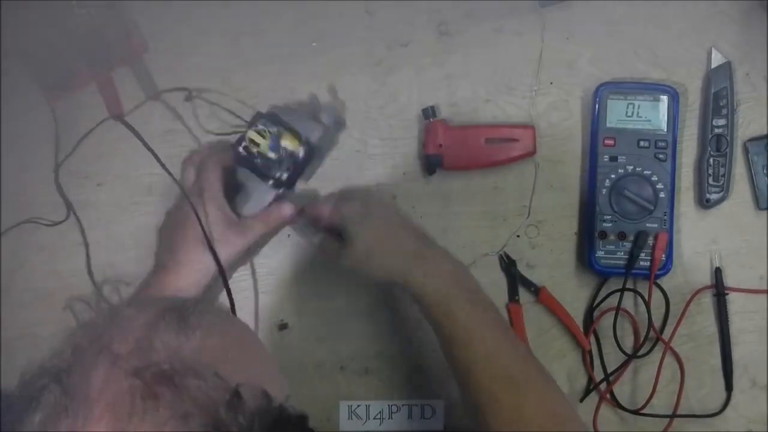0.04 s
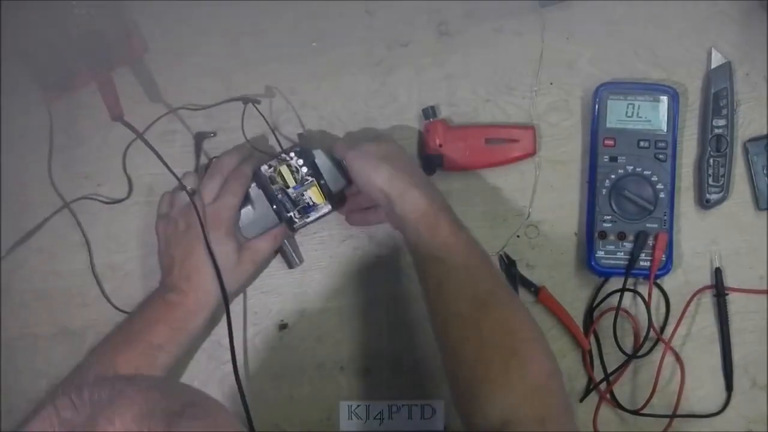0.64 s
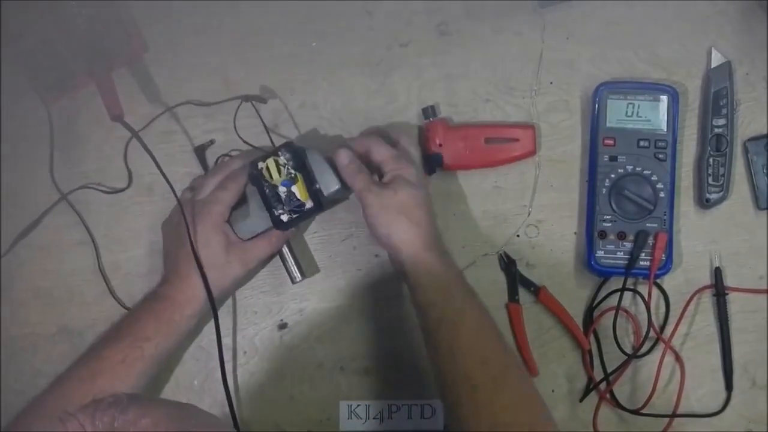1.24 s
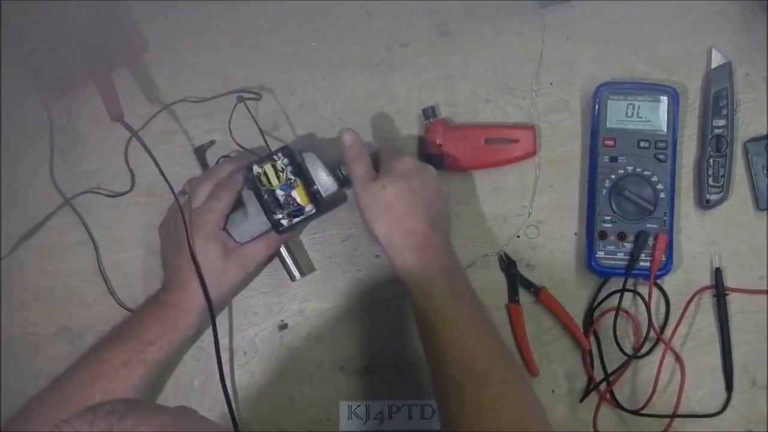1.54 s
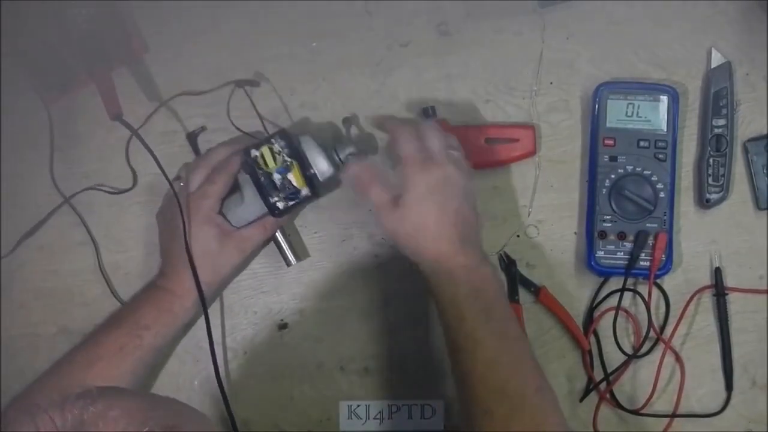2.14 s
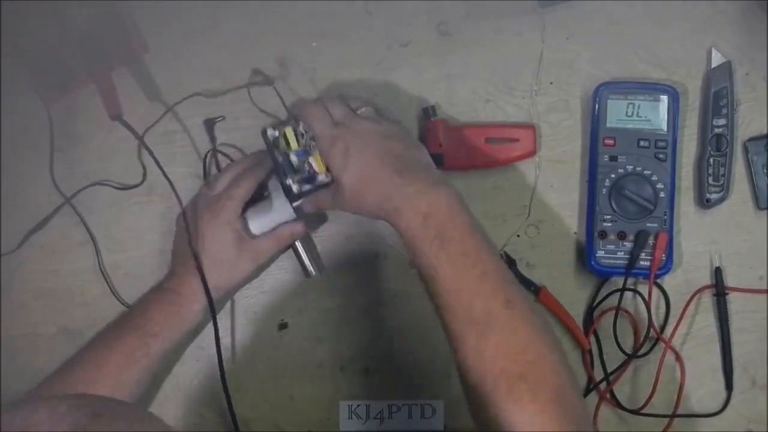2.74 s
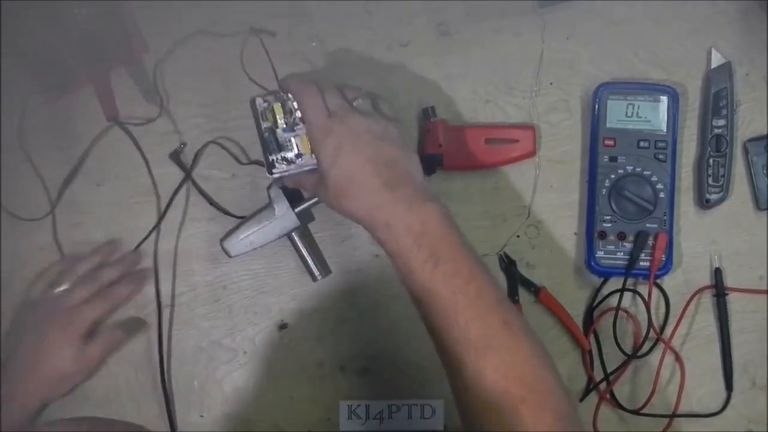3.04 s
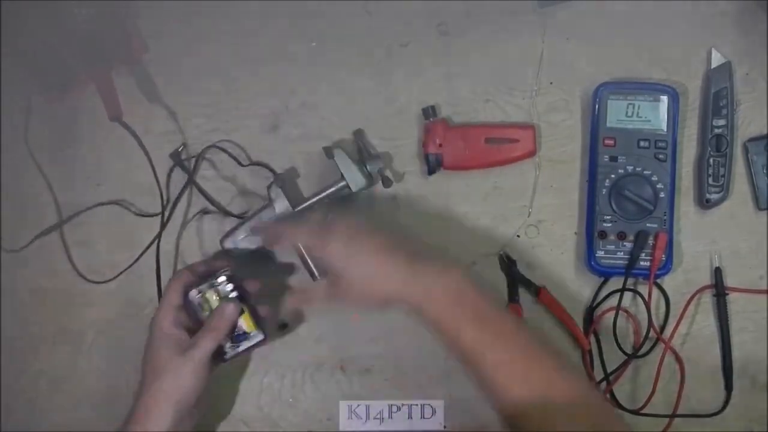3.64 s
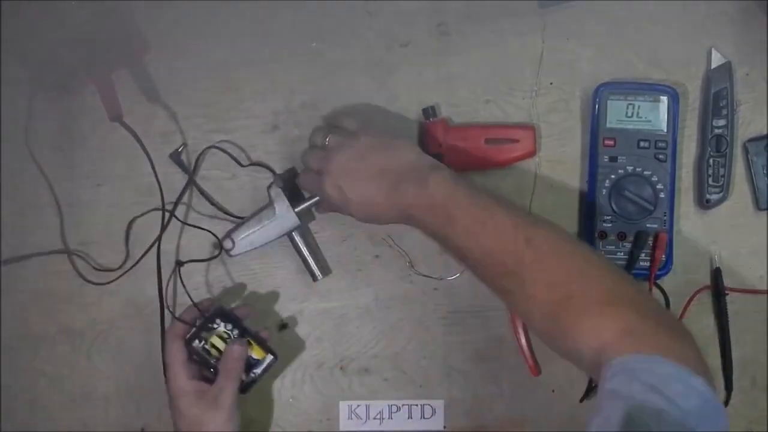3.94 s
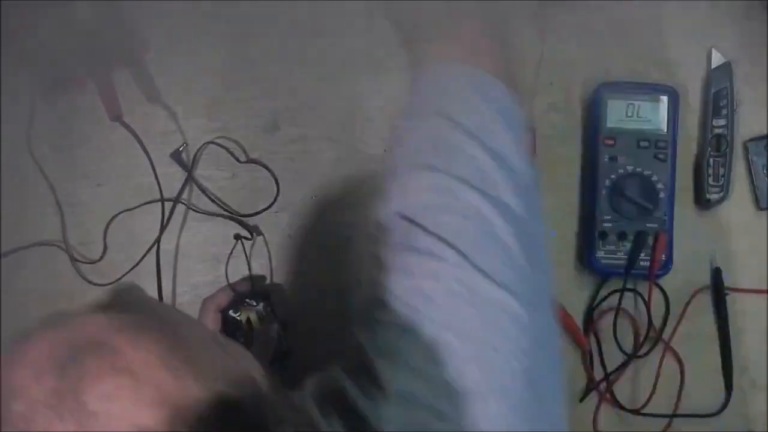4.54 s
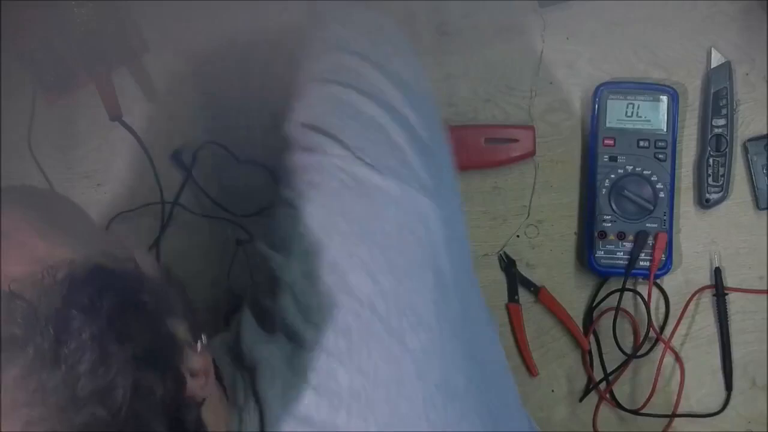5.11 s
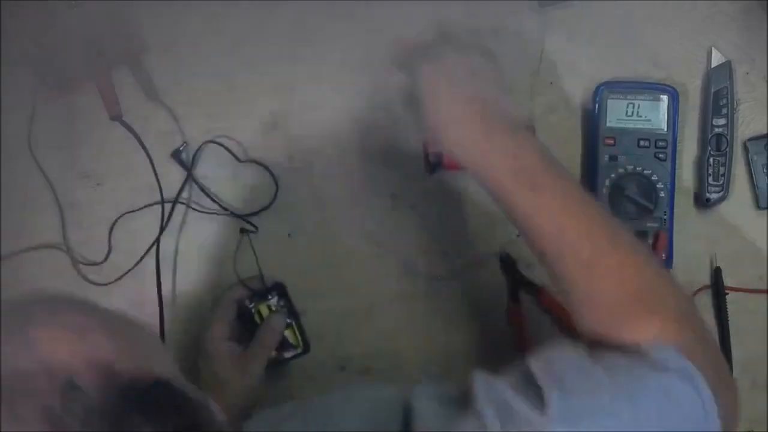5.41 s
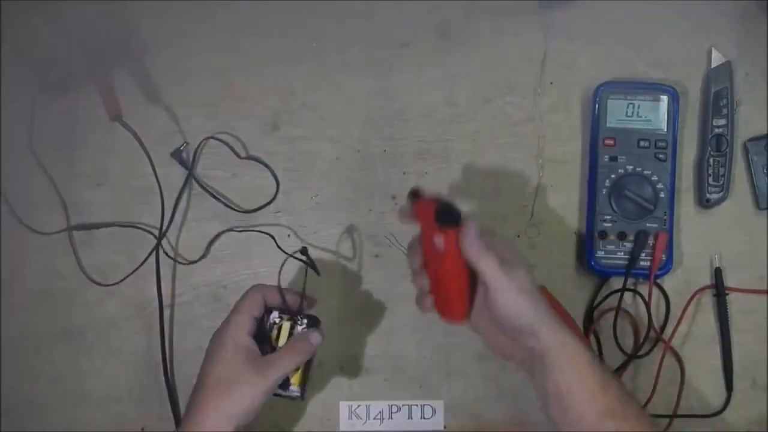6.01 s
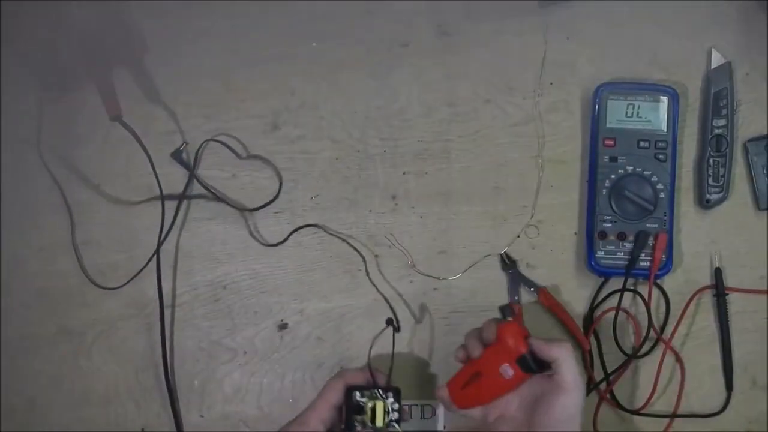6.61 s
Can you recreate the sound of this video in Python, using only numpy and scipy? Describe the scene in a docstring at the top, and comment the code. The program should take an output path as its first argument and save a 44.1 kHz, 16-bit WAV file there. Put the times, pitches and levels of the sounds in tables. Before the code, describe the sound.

A small vise and a plastic case scrape and thump on a wooden workbench, each blow making the top ring. The steel handle clinks, plastic clicks and briefly squeaks, and a sleeve swishes. A cluster of loud knocks and rattles follows as the vise is put away. Finally a small gas torch clicks several times and hisses faintly. It all sounds close, in a small workshop with a low throbbing hum.

```python
"""Scrapes and thumps on a wooden workbench, as a small vise is loosened, shifted and put away.
Each blow sets the bench top ringing. Steel parts clink, a plastic power-supply case clicks, scrapes
and squeaks, and a sleeve swishes. Then a small gas torch is picked up, clicks and hisses faintly.
Behind it all are the small workshop's air, a throbbing motor hum and a thin electronic whine.
A limiter turns everything down for a moment after the hardest blows."""
import sys
import numpy as np
from scipy import signal
from scipy.fft import rfft, irfft, next_fast_len
from scipy.io import wavfile
from scipy.ndimage import uniform_filter1d, minimum_filter1d

SR = 44100
rng = np.random.default_rng(int(sys.argv[2]) if len(sys.argv) > 2 else 0)


def int16_out(signal):
    """Quantize to a 16-bit WAV file."""
    q = np.round(np.clip(np.atleast_2d(signal).T, -1, 1) * 32767)
    wavfile.write(sys.argv[1], SR, q.astype(np.int16))


N = 298557
TIME = np.arange(N) / SR
RING_TIME = TIME[:SR // 2]  # half a second for one sound to die away


def bench(gain_db=36, ring_db=-17, clack_hz=1900, tick_hz=7000, spot_spread=1.37):
    """Each blow pushes the board once; its low tones and a blur of higher ones ring on."""
    # blows: start_s, body_db, thud_db, clack_db, tick_db, spot_hz, lift_db, chatter_db
    # thud, clack and tick are relative to the body; little chatter gives a clean, dry crack
    knocks = [ (.162, -20, 7, -17, -23, 256, 16, 16), (.168, -16, 6, -28, -14.5, 280, 6, 7),
              (0.188, -0.5, -3, -11, -21.5, 389, 10, 8), (0.227, -22.5, -3, -1, -28, 229, 20, 14),
              (.515, -17.5, -1.5, -26.5, -37, 340, 8, 17), (.545, -24, 0, -31, -37, 540, 3, 16),
              (0.759, -36.5, 14.5, -22, -24, 270, 4, 22), (0.802, -35.5, 9, -11, -32, 257, 16.5, 3.6),
              (0.983, -35, 12.5, -23, -19, 232, 6, 13), (1.892, -13, -6, -16.5, -38, 504, 3.5, 11),
              (2.389, -15, -7, -2, -30, 406, 1.5, 7.4), (2.3912, -17, -5, -9, -46, 1240, 5, 16),
              (2.402, -23.5, -14, -8, -24, 2100, 5, 0.67), (2.4179, -17, -2.5, -32, -32, 890, 5, 6),
              (2.792, -12, 1, -10.5, -26, 415, 0.5, 11), (2.795, -13.5, -4, -7.5, -23.5, 410, 7.5, 7.4),
              (2.828, -17.5, -5.5, -16, -40, 395, 2.5, 11), (4.0485, -8, -1, -16.5, -30, 246, -2.5, 16.5),
              (4.844, -5, -6, -16.5, -24, 248, 7.5, 19), (4.848, -13, -7.5, -4.5, -17, 280, -27, 4.4),
              (4.965, -25, 9, -10, -19, 380, -1, 14), (5.001, -23.5, -2, -14, -15, 940, 9, 12),
              (5.0343, -9.5, -9, -16, -48, 269, 4, 22), (5.038, -17.5, -8, -5.5, -25, 2320, -2, 1),
              (5.069, -25, -1, -15.5, -11, 2240, 11.5, 3), (5.654, -46.5, 6, -2, 4, 334, 23, 11),
              (5.724, -39, 1, -6, -23, 346, 17.5, 9)]
    # the bench top's natural tones (its "modes"): pitch_hz, level_db
    bench_modes = [(86, -26), (112, -18), (130, -9.5), (198, -17), (224, -7.5), (250, -9.5), (289, -4.5),
                   (322, -9.5), (370, -11.5), (395, -7), (432, -16), (505, -16.5), (575, -9.5), (645, -9.5),
                   (692, -6.5), (796, -39), (1036, -24), (1300, -14.5), (2080, -17)]
    # wood damps higher tones sooner: pitch_hz, fade_s
    bench_fades = [(90, .26), (250, .2), (400, .14), (800, .1)]
    # how strongly wood gives off each pitch: pitch_hz, level_db
    wood = [(30, -51), (60, -10), (90, 6.5), (250, 0.5), (400, 1.5), (700, 0), (1000, 5), (1500, 3.5),
            (2200, 7), (3000, 0), (4000, -6), (6000, -8), (10000, -13), (15000, -15)]
    board = [(hz, db, on_log_axis(hz, bench_fades)) for hz, db in bench_modes]
    out = np.zeros((2, N))
    for start_s, body_db, thud_db, clack_db, tick_db, spot_hz, lift_db, chatter_db in knocks:
        hardness = [(130, thud_db), (220, 0), (600, 0), (clack_hz, clack_db), (tick_hz, tick_db)]
        # the place that is struck favours some tones
        spot = [(spot_hz / spot_spread, 0), (spot_hz, lift_db), (spot_hz * spot_spread, 0)]
        tones = struck(board, detune=0.008)
        impact = contact(chatter_db, fade_s=0.22).mean(axis=0)
        blow = colour(impact + undb(ring_db) * tones, wood, hardness, spot)
        add(out, start_s, undb(body_db + gain_db) * room(blow, wet_db=-5, width_db=4.5))
    return out


def clicks(gain_db=33, shell_db=-14):
    """Small parts snap against each other and ring briefly on two tones."""
    # light clicks of the case and vise screw: start_s, snap_db, treble_db, pitch_hz, ring_db
    # treble and ring are relative to the snap
    snaps = [ (0.616, -40.5, -22, 2580, -31), (0.76, -37.5, -14, 1860, -2),
             (0.7967, -31.5, -13.5, 2980, 3.5), (0.815, -35.5, -17, 2120, 5), (.832, -36.5, -24, 2660, 4),
             (.904, -31.5, -29, 2070, -15), (1.241, -35.5, -21, 2600, -3), (1.383, -50.5, -22, 2330, 17),
             (2.1689, -38, -7, 2330, 0), (2.3164, -35, -31, 1060, 2.5), (2.3891, -38.5, -22, 3170, 16),
             (2.481, -35.5, -15, 1650, -18), (2.645, -47, -44, 1920, 3.5), (3.106, -32, -14.5, 1500, -2),
             (3.595, -55, -8, 1960, 11), (3.633, -38.5, -16, 2070, -1), (4.509, -49.5, -1.5, 2350, -1),
             (4.921, -35.5, -10, 1710, 8.5), (4.967, -36, -12, 2040, -8)]
    # how strongly plastic gives off each pitch: pitch_hz, level_db
    plastic = [(100, -41), (500, -2.5), (1000, -3.5), (1900, 4), (3000, 0.5), (4000, 2.5), (6000, 4),
               (9000, -0.5), (12000, -3.5), (15000, -6)]
    out = np.zeros((2, N))
    for start_s, snap_db, treble_db, pitch_hz, ring_db in snaps:
        tones = ring([(pitch_hz, 0, 0.014), (pitch_hz * 1.3, -6, 0.008)])
        snap = contact(chatter_db=45, fade_s=0.048) + undb(ring_db + shell_db) * tones
        click = colour(snap, plastic, [(2800, 0.0046), (6000, treble_db)])
        add(out, start_s, undb(snap_db + gain_db) * click)
    return room(out, wet_db=-1.5)


def handle(slide_s=0.0018, build_s=0.00088):
    """The vise handle grates through its hole, hits its stop and gives a short, tight clink."""
    # the sliding handle drops: hit_s, ring_db, grit_db (relative to the ring)
    drops = [(.426, 14, -13), (1.4395, -3, -10)]
    # the handle's tones: pitch_hz, level_db, fade_s
    handle_modes = [(1815, 0, .032), (1930, -7, .02), (2430, -9, .02), (3005, -14, .025)]
    clink = ring(handle_modes) * (1 - np.exp(-RING_TIME / build_s))
    out = np.zeros((2, N))
    for hit_s, ring_db, grit_db in drops:
        grit = contact(chatter_db=30, fade_s=0.016, build_s=0.004)
        grit = colour(grit, [(1000, -14), (3000, 0.0072)])
        add(out, hit_s - slide_s, undb(ring_db + grit_db) * grit)
        add(out, hit_s, undb(ring_db) * clink)
    return room(out, wet_db=-6.5)


def clinks(bright_gain_db=9, low_gain_db=1, low_fade_s=0.062, rattle_db=-8):
    """The loose steel screw and handle rattle and ring high and thin."""
    # steel meets steel: start_s, low_hz, low_db, bright_db
    hits = [ (0.425, 8050, -21, -42), (0.983, 6090, -27, -38), (2.168, 7180, -19.5, -21),
            (2.394, 7100, -28, -24), (2.796, 7090, -17, -31), (4.508, 6500, -22, -38),
            (4.846, 6330, -21, -22), (4.92, 6370, -19, -34), (4.966, 6360, -15, -39),
            (5.005, 7060, -19, -25)]
    # the steel's bright upper tones: pitch_hz, level_db, fade_s
    steel_modes = [(12250, -8, .02), (13990, 0, .045), (14300, -4, .02), (14700, -7, .015),
                   (15450, -10, .012)]
    out = np.zeros((2, N))
    for start_s, low_hz, low_db, bright_db in hits:
        touch = contact(chatter_db=13, fade_s=0.039)
        rattle = colour(touch, [(3000, -37), (8000, -52), (12000, 12), (14500, 9)])
        bright = struck(steel_modes, detune=0.005) + undb(rattle_db) * rattle
        low = ring([(low_hz, low_db + low_gain_db, low_fade_s)])
        add(out, start_s, room(low + undb(bright_db + bright_gain_db) * bright, wet_db=-3.5))
    return out


def torch(gain_db=35, gas_db=-50, gas_on_s=6.655, opening_s=0.0059):
    """Snaps of the trigger and lock ring the plastic shell; the last one opens the gas."""
    # snaps: start_s, snap_db, treble_db, shell_db, chatter_db, chatter_fade_s
    snaps = [(6.1968, -22, 4.5, -8.5, 16, 0.033), (6.1999, -28, -5, -7, 10, 0.01),
             (6.425, -34.5, -2, -5.5, -4, 0.082), (6.4524, -32.5, -3.5, -6.5, 16, 0.076),
             (6.574, -51.5, 19, -32, 21, 0.013), (6.652, -20.5, -7, -28, 29, 0.18)]
    # the shell's tones: pitch_hz, level_db, fade_s
    shell_modes = [(1399, -3, 0.075), (1980, -1, 0.03), (2155, -1, .03), (2240, -7, 0.02),
                   (3140, -8.5, 0.012), (4700, -2.5, 0.0082), (5200, -15, .006), (5900, -6, 0.0066)]
    # the hiss of escaping gas: pitch_hz, level_db
    hiss = [(60, -10), (200, 4.5), (900, -12), (2300, 0), (4000, -11), (8000, -17), (15000, -30)]
    out = np.zeros((2, N))
    for start_s, snap_db, treble_db, shell_db, chatter_db, chatter_fade_s in snaps:
        body = [(200, -29), (800, -14), (1300, -10.5), (2500, -9.5)]
        treble = [(5500, treble_db - 18), (14000, treble_db - 24.5)]
        shell = struck(shell_modes, detune=0.0063)
        touch = contact(chatter_db, chatter_fade_s)
        snap = touch + undb(shell_db) * resonate(touch, shell)
        add(out, start_s, undb(snap_db + gain_db) * colour(snap, body + treble))
    valve = np.clip((TIME - gas_on_s) / opening_s, 0, 1)
    gas = level(colour(stereo_noise(N), hiss), gas_db) * valve
    return room(out, wet_db=-6) + gas


def rubbing():
    """Hard parts rasp over the wood, shake it and ring the case; cloth gives a finer swish."""
    # vise, case and torch are pushed along: start_s, length_s, level_db, rumble_db (relative to the rasp)
    scrapes = [ (0, 0.07, -38.5, 4.5), (0.074, 0.11, -33.5, 5), (0.423, 0.097, -35, 3.5),
               (0.755, 0.045, -40.5, -9), (0.802, 0.025, -34.5, -19), (0.834, 0.116, -48, -2),
               (2.762, 0.025, -42.5, 1), (2.93, 0.12, -46.5, -5.5), (3.248, 0.11, -61, -6),
               (3.582, 0.088, -53.5, -4), (4.012, 0.03, -46.5, 9), (5.598, 0.12, -53, 8),
               (6.437, 0.045, -50, -13)]
    # sleeve and hands brush past: middle_s, length_s, level_db
    swishes = [(3.154, 0.089, -48), (3.287, 0.11, -47.5), (3.383, 0.07, -46), (4.32, 0.22, -55),
               (5.418, 0.26, -53.5), (5.652, 0.33, -50.5), (5.917, 0.43, -57.5), (6.482, 0.23, -57)]
    # the plastic case's tones: pitch_hz, level_db, fade_s
    case_modes = [(2070, -9, 0.019), (2710, 11, 0.016), (3300, 23, 0.012)]
    # the tone colours of rasping parts, shaking wood and cloth: pitch_hz, level_db
    rasp_colour = [(300, 2.5), (700, -0.5), (1400, 5.5), (2200, 6), (3200, -6), (4200, -7.5), (7000, -18.5),
                   (12000, -22), (16000, -53)]
    rumble_colour = [(25, -40), (60, -18), (110, -2.5), (230, -5.5), (310, -9.5), (390, 3.5), (520, -9.5),
                     (1000, -15.5), (3000, -51)]
    cloth_colour = [(150, -8), (500, -7), (1200, -0.5), (2200, 2), (3500, -3), (4800, -2.5), (6500, -11.5),
                    (11500, -9), (13500, -14), (16000, -28)]
    catches = colour(grainy(rough_db=0.5, grain_samples=60), rasp_colour)
    case = resonate(catches, ring(case_modes))
    rasp = level(catches, db=-2) + level(case, db=-12)
    rumble = level(colour(grainy(rough_db=2.5, grain_samples=200), rumble_colour), db=-2)
    cloth = level(colour(grainy(rough_db=1.5, grain_samples=140), cloth_colour), db=1)
    out = np.zeros((2, N))
    for start_s, length_s, level_db, rumble_db in scrapes:
        out += undb(level_db) * push(start_s, length_s) * (rasp + undb(rumble_db) * rumble)
    for middle_s, length_s, level_db in swishes:
        out += undb(level_db) * stroke(middle_s, length_s) * cloth
    return room(out, wet_db=-2.5)


def squeak():
    """Plastic slips over steel: a rough tone that rises as the case comes free."""
    # the case slips from the jaws: middle_s, length_s, level_db, pitch_hz, rise_hz_per_s
    slip = (3.393, .06, -47, 2950, 14000)
    middle_s, length_s, level_db, pitch_hz, rise_hz_per_s = slip
    phase = 2 * np.pi * np.cumsum(pitch_hz + rise_hz_per_s * (TIME - middle_s)) / SR
    grip = uniform_filter1d(stereo_noise(N), size=90)
    return level(grip * np.sin(phase), level_db) * stroke(middle_s, length_s)


def background(air_db=-46.5, wander=0.2):
    """Room air, two motors whose close pitches throb together, and a whining power supply."""
    # the soft rush of room air: pitch_hz, level_db
    air = [(15, -1.5), (25, -34.5), (70, -1), (236, -15.5), (476, -19), (796, -22.5), (1330, -21),
           (2110, -26.5), (2480, -24), (3720, -32.5), (4250, -31), (5000, -37), (13600, -43.5),
           (14800, -69), (16000, -84)]
    # two motor hums and two whine tones: pitch_hz, level_db
    tones = [(54.3, -52.5), (58.1, -51), (4290, -71), (14836, -67)]
    out = level(colour(stereo_noise(N, width_db=7.5), air), air_db)
    for pitch_hz, level_db in tones:
        drift = wander * np.cumsum(rng.standard_normal(N)) / np.sqrt(SR)
        out += level(np.sin(2 * np.pi * (pitch_hz * TIME + drift)), level_db)
    return out


def room(x, wet_db, width_db=0, build_s=0.00012):
    """Close walls echo almost at once, and low pitches linger longest; wet_db sets how much echo."""
    # how long the echo lasts: pitch_hz, fade_s
    echo_fades = [(100, 0.9), (400, 0.5), (1500, 0.4647), (4000, 0.45), (12000, 0.35)]
    centres_hz, fades_s = np.transpose(echo_fades)
    noise = rfft(stereo_noise(len(RING_TIME), width_db))
    hz = np.fft.rfftfreq(len(RING_TIME), 1 / SR)
    tail = 0
    for share, fade_s in zip(np.eye(len(centres_hz)), fades_s):
        band = on_log_axis(hz, list(zip(centres_hz, share)))
        tail = tail + irfft(noise * band) * fade(fade_s)
    onset = 1 - np.exp(-(RING_TIME / build_s) ** 2)
    walls = [(100, -1), (350, -6.5), (800, 0), (2000, -0.5), (6000, 1.5), (14000, 0)]
    return x + undb(wet_db) * resonate(x, colour(unit(tail * onset), walls))


def limiter(x, threshold_db=-8.5, hold_s=0.34, recover_db_per_s=40):
    """A loud blow pushes the volume down at once; it stays there a moment, then creeps back."""
    power = uniform_filter1d(np.mean(x ** 2, axis=0), size=440)
    over_db = 10 * np.log10(np.maximum(power / undb(threshold_db) ** 2, 1))
    half = int(hold_s * SR / 2)
    held_db = -minimum_filter1d(-over_db, 2 * half + 1, origin=half, mode="constant")
    recovery = recover_db_per_s * TIME
    return x * undb(recovery - np.maximum.accumulate(held_db + recovery))


def contact(chatter_db, fade_s, build_s=0.00004):
    """One sharp tap, then a dense, dying chatter; chatter_db is relative to the tap."""
    tap = RING_TIME == 0
    chatter = stereo_noise(len(RING_TIME)) * fade(fade_s) * (1 - np.exp(-RING_TIME / build_s))
    return unit(tap + undb(chatter_db) * unit(chatter))


def struck(modes, detune, scatter_db=1.5):
    """Each hit rings the tones a little differently, and the grip shifts their pitch slightly."""
    chance = rng.standard_normal((len(modes), 2))
    return ring([(hz * (1 + detune * shift), db + scatter_db * boost, fade_s)
                 for (hz, db, fade_s), (shift, boost) in zip(modes, chance)])


def ring(modes):
    """Pure tones that die away, each with the energy its level gives."""
    return sum(undb(db) * unit(np.cos(2 * np.pi * hz * RING_TIME) * fade(fade_s))
               for hz, db, fade_s in modes)


def fade(fade_s):
    """A smooth decay that falls 60 dB in fade_s."""
    return np.exp(-np.log(1000) * RING_TIME / max(fade_s, 1 / SR))


def push(start_s, length_s, attack_s=0.0009, release_s=0.006):
    """Loudness of one push: it gets going, holds its speed, then runs out."""
    rise = np.clip((TIME - start_s) / attack_s, 0, 1)
    return rise * np.exp(-np.maximum(TIME - start_s - length_s, 0) / release_s)


def stroke(middle_s, length_s):
    """Loudness of one arm movement: it speeds up, peaks midway and slows down."""
    return np.exp(-(2 * (TIME - middle_s) / length_s) ** 2)


def grainy(rough_db, grain_samples):
    """Noise whose strength jumps from one tiny catch to the next."""
    catches = np.repeat(rng.standard_normal(N // grain_samples + 1), grain_samples)[:N]
    return stereo_noise(N) * undb(rough_db * catches)


def stereo_noise(size, width_db=0):
    """Noise that is alike in both ears in the bass and wide in the treble."""
    # how much left and right differ: pitch_hz, side_db (relative to the middle)
    width = [(60, -18.5), (300, -12.5), (1000, -14.5), (2200, -13), (4500, -6), (8000, -4), (14000, -5)]
    mid, side = rng.standard_normal((2, size))
    side = undb(width_db) * colour(side, width)
    return np.array([mid + side, mid - side])


def colour(x, *curves):
    """Make some pitches louder and others softer, by the sum of (pitch_hz, level_db) curves."""
    n = 2 * next_fast_len(x.shape[-1])
    hz = np.fft.rfftfreq(n, 1 / SR)
    gain = undb(sum(on_log_axis(hz, curve) for curve in curves))
    # fold the filter so that nothing sounds before the hit that causes it
    cepstrum = irfft(np.log(gain))
    cepstrum[1:n // 2] *= 2
    cepstrum[n // 2 + 1:] = 0
    return irfft(rfft(x, n) * np.exp(rfft(cepstrum)))[..., :x.shape[-1]]


def resonate(x, response):
    """Let every sample of x set off the same ring or echo."""
    return signal.fftconvolve(np.atleast_2d(x), np.atleast_2d(response), axes=-1)[:, :x.shape[-1]]


def on_log_axis(hz, points):
    """Read between (pitch_hz, value) points, with octaves evenly spaced."""
    knots, values = np.transpose(points)
    return np.interp(np.log(hz + 1), np.log(knots), values)


def undb(db):
    """Turn decibels into a multiplier."""
    return 10 ** (np.asarray(db) / 20)


def unit(x):
    """Scale to an average energy of 1 per channel."""
    return x / np.sqrt(np.mean(np.sum(x ** 2, axis=-1)))


def level(x, db):
    """Scale to an average (rms) level."""
    return x * undb(db) / np.sqrt(np.mean(x ** 2))


def add(track, start_s, sound):
    """Mix a sound into the track."""
    start = max(int(start_s * SR), 0)
    track[:, start:start + sound.shape[-1]] += sound[..., :N - start]


def scene():
    """Everything on the bench, over the room's own sound."""
    return bench() + clicks() + handle() + clinks() + torch() + rubbing() + squeak() + background()


def record(dry):
    """Turn down after the hardest blows and cut the highest treble."""
    top_hz = 15750
    treble_cut = signal.ellip(8, 0.2, 70, top_hz, fs=SR, output="sos")
    return signal.sosfilt(treble_cut, limiter(dry))


dry = scene()
out = record(dry)
int16_out(out)
```